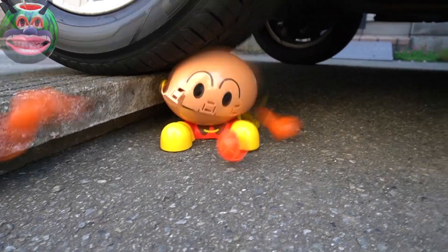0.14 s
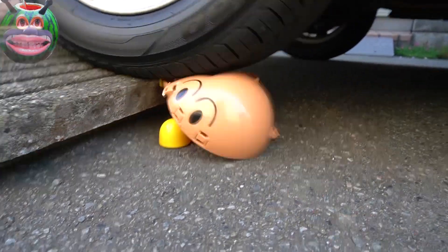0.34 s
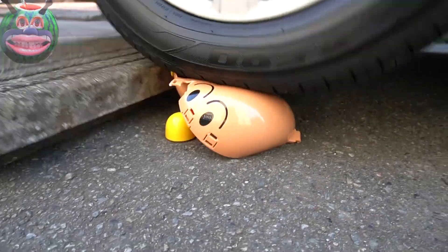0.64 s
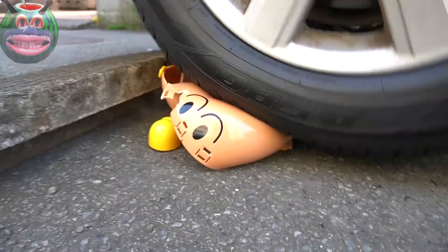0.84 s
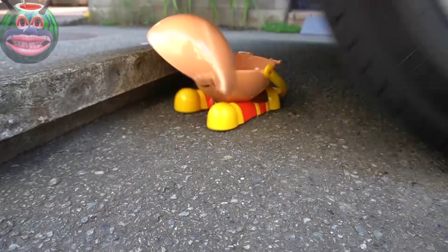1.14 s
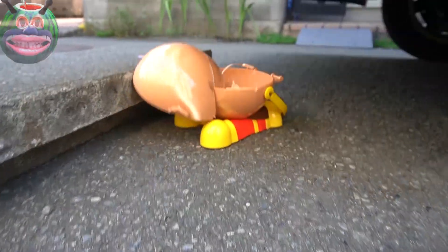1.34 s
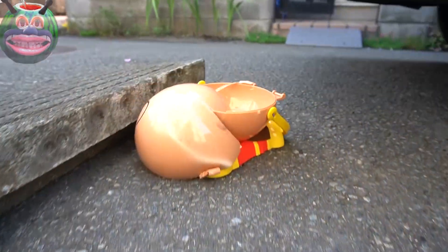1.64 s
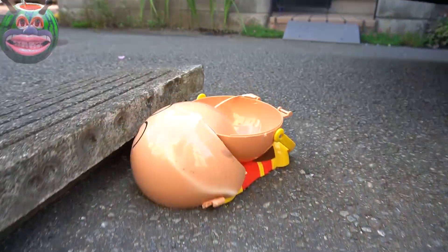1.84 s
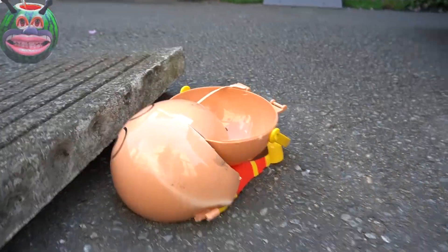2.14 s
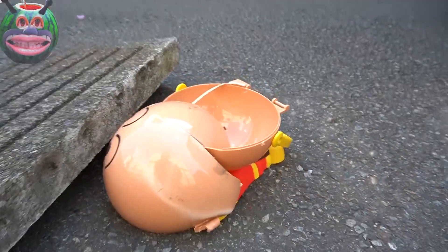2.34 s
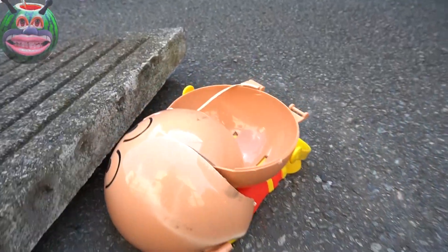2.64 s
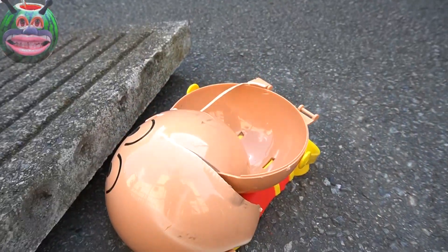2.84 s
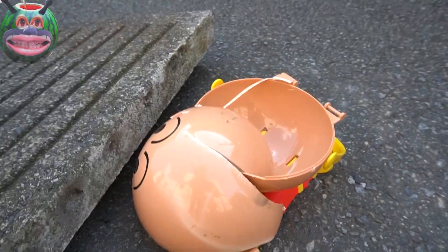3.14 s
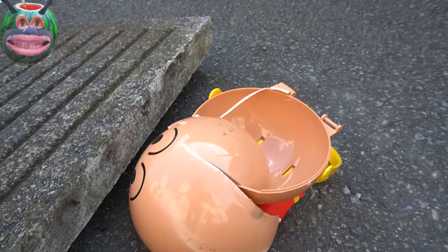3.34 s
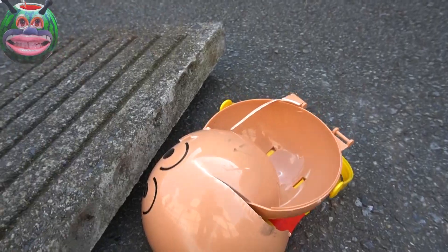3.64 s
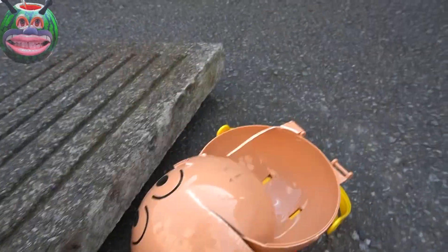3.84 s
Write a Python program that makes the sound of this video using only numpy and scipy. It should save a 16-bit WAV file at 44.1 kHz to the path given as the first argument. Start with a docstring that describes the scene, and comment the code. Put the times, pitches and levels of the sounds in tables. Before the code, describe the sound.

Loud cracking and crunching of a hollow plastic toy under a car tyre, close by on asphalt. The shell groans and squeaks, then its halves rattle and settle. Quiet street air follows, ending with one sharp tick.

```python
"""Loud cracking and crunching: a car tyre rolls over a hollow hard plastic toy on asphalt by a concrete ramp.
Quick slips, cracks and grinding grit excite the shell's resonances; it hums while pinned and squeaks
under the rubber, then the halves spring free, rattle and settle by 1.8 s. Quiet street air remains,
with a low rumble, a thin whine, soft thuds near the microphone, faint ticks and a last sharp one."""
import sys
import numpy as np
from scipy import signal
from scipy.io import wavfile

SR = 44100
rng = np.random.default_rng(int(sys.argv[2]) if len(sys.argv) > 2 else 0)


def transcribe(u):
    """Save the signal u as a 16-bit wav file named by the first command-line argument.

    u: samples, shape (n,) or (channels, n), limited to [-1, 1]; the rate is SR.
    q: integer samples, one column per channel.
    """
    v = np.clip(np.atleast_2d(u).T, -1, 1)
    q = np.round(v * 32767).astype(np.int16)
    wavfile.write(sys.argv[1], SR, q)


N = 176400

# Resonances of the shell's hollow body and of its wall: pitch_hz, width_hz, gain_db
BODY_MODES = [(341, 31, -3), (494, 65, -1.5), (681, 129, 1.5), (793, 140, 1), (964, 92, 1), (1265, 160, -1)]
WALL_MODES = [(1620, 173, 1), (2190, 440, -2), (2654, 183, 3.5), (3226, 690, -0.5), (4154, 430, -1),
              (4293, 297, -0.5)]
TIME_S = np.arange(N) / SR
ATTACK_S = 0.00054   # of cracks and knocks
SIDE_DB = -9         # part of the crunch that differs between the ears
MODE_SWELL_DB = 2.5  # how much each resonance comes and goes under friction


def amp(db):
    return 10 ** (np.asarray(db) / 20)


def unit_rms(x):
    return x / np.sqrt(np.mean(x ** 2) + 1e-20)


def pan(left_over_right_db):
    return amp(left_over_right_db * np.array([[.5], [-.5]]))


def highpass(x, hz, order=2):
    return signal.sosfilt(signal.butter(order, hz, "high", fs=SR, output="sos"), x)


def in_time(rows):
    """Linear interpolation of each column over the time in the first; end values are held."""
    times, *columns = np.transpose(rows)
    return [np.interp(TIME_S, times, column) for column in columns]


def at_hz(points, hz):
    """Interpolation on a logarithmic frequency axis."""
    frequencies, values = np.transpose(points)
    return np.interp(np.log(hz), np.log(frequencies), values)


def drift(rate_hz):
    """Slow random modulation: low-passed noise of unit rms."""
    step, run_in = 40, 2000
    pole = np.exp(-2 * np.pi * rate_hz * step / SR)
    noise = rng.standard_normal(N // step + run_in + 2)
    slow = signal.lfilter([1], [1, -2 * pole, pole * pole], noise)[run_in:]
    return np.interp(np.arange(N) / step, np.arange(len(slow)), unit_rms(slow))


def resonate(x, hz, width_hz, stages=1):
    """Damped resonators in series, each with unit gain at its peak."""
    r = np.exp(-np.pi * width_hz / SR)
    feedback = [1, -2 * r * np.cos(2 * np.pi * hz / SR), r * r]
    for _ in range(stages):
        x = signal.lfilter(np.array([1, 0, -1]) * (1 - r * r) / 2, feedback, x)
    return x


def modal_bank(x, modes, swell_db=0):
    """Modal superposition: resonances of alternating sign, normalised by their summed noise power."""
    power = sum(amp(2 * db) * np.pi * width_hz / SR for _, width_hz, db in modes)
    out = 0
    for k, (hz, width_hz, db) in enumerate(modes):
        swell = amp(swell_db * np.tanh(drift(25))) if swell_db else 1
        out += (-1) ** k * amp(db) * swell * resonate(x, hz, width_hz)
    return out / np.sqrt(power)


def damped_sines(rows, rise_s, fall_s):
    """Free vibration: one exponentially decaying sine for each row of start_s, level_db, pitch_hz."""
    out, t = np.full(N + SR, 1e-18), np.arange(SR // 8) / SR
    envelope = (1 - np.exp(-t / rise_s)) * np.exp(-t / fall_s)
    envelope /= envelope.max()
    for start_s, db, hz in rows:
        i = int(start_s * SR)
        out[i:i + len(t)] += amp(db) * envelope * np.sin(2 * np.pi * hz * t)
    return out[:N]


def burst_noise(count, size):
    """Partly coherent stereo noise, saturated to an even size; axes are burst, ear, sample."""
    mid, side = np.tanh(3 * rng.standard_normal((2, count, size)))
    side *= amp(SIDE_DB)
    return np.stack([mid + side, mid - side], axis=1) / np.sqrt(1 + amp(2 * SIDE_DB))


def banded_noise(spectrum, flicker_db):
    """Diffuse noise of unit rms: half-octave bands, each with its own level and interaural coherence."""
    # Likeness of the two ears: frequency_hz, coherence
    coherences = [(60, 1), (180, 0.86), (550, 0.98), (1650, 0.16), (4970, 0.86), (15000, 0.85)]
    # Interaural level difference: frequency_hz, left_over_right_db
    balance = [(60, -2), (180, 1), (550, -5), (1650, -9.5), (4970, -6), (15000, -7)]
    out, edges = 0, 25 * 2 ** np.arange(0, 9.6, .5)
    white = rng.standard_normal((2, 2, N))
    for k, (low, high) in enumerate(zip(edges, edges[1:])):
        hz = np.sqrt(low * high)
        if spectrum[0][0] <= hz <= spectrum[-1][0]:
            bandpass = signal.butter(2, [low, high], "band", fs=SR, output="sos")
            mid, side = signal.sosfilt(bandpass, white[k % 2])
            coherence = np.clip(at_hz(coherences, hz), -1, 1)
            band = np.sqrt(1 + coherence) * mid + np.sqrt(1 - coherence) * side * [[1], [-1]]
            out += amp(at_hz(spectrum, hz) + flicker_db * drift(22)) * pan(at_hz(balance, hz)) * band
    return unit_rms(out)


def splinters(x):
    """Splintering plastic radiates a gently falling treble band, less coherent between the ears."""
    mid = (x[0] + x[1]) / 2
    side = (x[0] - x[1]) / 2 * amp(4)
    treble = highpass(np.array([mid + side, mid - side]), hz=4600, order=3)
    return signal.lfilter([1], [1, -0.88], treble)


def friction_grains(per_s=9800, spread_db=5, end_s=1.76):
    """Shot noise: grit and tearing plastic give dense random impulses of uneven size."""
    occurs = rng.random((2, N)) < per_s / SR
    sizes = amp(spread_db * np.minimum(rng.exponential(1, (2, N)), 3))
    mid, side = occurs * sizes * rng.choice([-1, 1], (2, N))
    grains = unit_rms(mid + amp(SIDE_DB) * side * [[1], [-1]])
    return grains * (TIME_S < end_s) * amp(1.1 * drift(150))


def grind(grains):
    """Forced vibration: the grains drive the shell under the tyre and through its final rattle."""
    # Drive to each part of the shell: time_s, wall_db, body_db, splinter_db
    drive = [(0, -18, -16.5, -31), (0.045, -21.5, -46, -36.5), (0.065, -22, -24, -32),
             (0.12, -65, -34.5, -42), (0.188, -27, -28, -32.5), (0.2, -12.5, -20, -19),
             (0.23, -17, -23, -25), (0.25, -14.5, -21, -20), (0.3, -22.5, -27.5, -26.5),
             (0.315, -16, -27, -18.5), (0.35, -15, -17.5, -28.5), (0.385, -24, -23.5, -28),
             (0.41, -18, -21, -22), (0.46, -15.5, -19, -32), (0.49, -24.5, -30, -26.5),
             (0.52, -30, -31, -31.5), (0.56, -28, -25.5, -31), (0.6, -28, -37, -27),
             (0.63, -19.5, -25, -23.5), (0.66, -19, -22, -17.5), (0.7, -19, -23, -15.5),
             (0.735, -21, -25, -16.5), (0.75, -21, -29, -35.5), (0.775, -31, -57, -32.5),
             (0.8, -26, -20, -25.5), (0.83, -23, -26, -21), (0.87, -22, -23.5, -22.5),
             (0.9, -24, -29, -24.5), (0.98, -27, -24.5, -32), (1.02, -18, -34.5, -29),
             (1.055, -34, -32, -57), (1.09, -23.5, -30, -74.5), (1.125, -33, -37, -99),
             (1.15, -15, -30.5, -47), (1.185, -37, -28, -77), (1.205, -34.5, -44, -56),
             (1.24, -20, -20.5, -42), (1.28, -32, -38, -42), (1.31, -31, -32.5, -47),
             (1.34, -29.5, -27.5, -47), (1.37, -37, -38, -49), (1.44, -56, -49, -60),
             (1.48, -40, -36.5, -79), (1.545, -74, -68, -77), (1.565, -21, -54, -54),
             (1.6, -25, -30.5, -43), (1.65, -39, -48, -78.5), (1.76, -73, -54.5, -78)]
    wall_db, body_db, splinter_db = in_time(drive)
    body = modal_bank(grains.mean(axis=0) * amp(body_db), BODY_MODES, MODE_SWELL_DB)
    wall = modal_bank(grains * amp(wall_db), WALL_MODES, MODE_SWELL_DB)
    return body + wall + splinters(grains * amp(splinter_db))


def rumble():
    """Low-frequency broadband noise of the rolling tyre, then of the street."""
    # Envelope of the rumble: time_s, level_db
    levels = [(0, -43), (.14, -45), (.25, -40), (.31, -49), (.36, -38.5), (.42, -53), (.48, -45), (.8, -46),
              (1.0, -50.5), (1.38, -62.5), (2.4, -55.5), (3.3, -58.5), (3.6, -51), (4.0, -46)]
    # Its relative spectral density: frequency_hz, density_db
    spectrum = [(15, -54), (25, -32), (102, 2.5), (172, 4), (216, 7.5), (382, -10), (520, -51), (880, -120)]
    return amp(in_time(levels)[0]) * banded_noise(spectrum, flicker_db=1)


def cracks():
    """Impulsive excitation: each crack is a push, a click and a dying burst that ring the shell."""
    # Cracks of the shell: start_s, level_db, ring_hz, hollow_hz, body_gain_db, splinter_gain_db, t60_s
    events = [(0.0084, -8.5, 2630, 1230, -12, -13, 0.023), (0.0224, -5, 2320, 627, -8, -14, 0.029),
              (0.07, -6, 3300, 800, -33, -18.5, 0.049), (0.085, -4.5, 2820, 704, -21, -16, 0.047),
              (0.0974, -1, 2330, 726, -21, -20, 0.036), (0.1072, -4, 3400, 600, -22, -16, 0.086),
              (0.1228, -4, 2640, 580, -18, -14, 0.028), (0.1328, -3, 3350, 576, -27, -18, 0.017),
              (0.1397, -3, 2750, 590, -19, -16, 0.024), (0.1487, -1, 2780, 1220, -33, -15, 0.02),
              (0.1584, -4.5, 3320, 560, -32, -18, 0.032), (0.1689, -3.5, 2550, 1280, -19, -18, 0.02),
              (0.1784, -2.5, 2970, 520, -25, -22, 0.035), (0.1933, -1, 2580, 1294, -18, -11.5, 0.044),
              (0.2129, -3.5, 2800, 476, -14, -8, 0.017), (0.258, -9, 1760, 1280, -2, -6, 0.017),
              (0.2733, -17, 4200, 477, -8, -8, 0.05), (0.3097, -7.5, 2950, 670, -6.5, -5.5, 0.051),
              (0.3774, -9, 3650, 668, -18, -9, 0.03), (0.396, -5, 2920, 654, -23.5, -4.5, 0.035),
              (0.4549, -15.5, 3420, 684, -15, -1.5, 0.047), (0.4944, -19, 3860, 746, -26, -35, 0.049),
              (0.5064, -25, 3520, 352, -30, 2.5, 0.02), (0.5238, -10, 3380, 810, -17, -22, 0.076),
              (0.5382, -16, 3100, 960, -11, -1, 0.027), (0.5466, -6.5, 1730, 945, -17, -9.5, 0.015),
              (0.5689, -41, 4100, 980, -28, 21.5, 0.041), (0.7358, -12.5, 3300, 980, -18, -2.5, 0.012),
              (0.7545, -7, 1660, 760, -17, -11, 0.013), (0.7673, -10.5, 2130, 840, 4.5, 0.5, 0.02),
              (0.9028, -5.5, 2300, 784, -22, -14, 0.031), (0.9212, -9, 1820, 700, -30, -14, 0.02),
              (0.9376, -10, 2620, 710, -9, -6, 0.026), (0.9448, -5.5, 1620, 890, -8, -7, 0.015),
              (0.9879, -6, 3050, 1020, -14.5, -20, 0.037), (1, -10.5, 2750, 754, -41, -2, 0.025),
              (1.015, -9.5, 3150, 990, -6, -9, 0.047), (1.0209, -11, 2470, 990, -6.5, -6.5, 0.041),
              (1.0418, -15, 3200, 920, -12, -25, 0.031), (1.066, -7.5, 1420, 1010, -14.5, -15.5, 0.069),
              (1.0814, -6.5, 3070, 931, -28, -37, 0.027), (1.1024, -11.5, 3100, 1050, -8.5, -18, 0.055),
              (1.1329, -7.5, 2860, 850, -15.5, -16.5, 0.058), (1.1463, -6, 3220, 880, -11, -17, 0.019),
              (1.1632, -7, 1860, 1300, -8, -11, 0.045), (1.2157, -14, 1660, 920, -5.5, -13, 0.088),
              (1.2314, -5, 2090, 800, -20, -19, 0.069), (1.2644, -11, 2900, 800, -9.5, -23, 0.073),
              (1.3225, -16, 1760, 1026, -8, -14, 0.072), (1.4568, -31, 3600, 1100, 0, -17.5, 0.073),
              (1.4754, -34, 2440, 1290, -7, -11.5, 0.035), (1.5027, -32, 1780, 890, -6.5, -21, 0.094),
              (1.559, -20, 2960, 765, -4.5, -20.5, 0.11), (1.5718, -11, 2800, 886, -8.5, -29, 0.056),
              (1.6358, -22, 2800, 786, -4.5, -24, 0.098), (1.6735, -21.5, 3140, 850, -26, -25, 0.055),
              (1.731, -29, 2950, 778, -26, -29, 0.065)]
    click_db, snap_db, snap_s = 11, 8, 0.00055
    size = SR // 8
    t = np.arange(size) / SR
    onset = (1 + amp(snap_db) * np.exp(-t / snap_s)) * (1 - np.exp(-t / ATTACK_S))
    body, wall, treble, rings, push = np.full((5, 2, N + size), 1e-18)
    for noise, event in zip(burst_noise(len(events), size), events):
        start_s, db, ring_hz, hollow_hz, body_db, splinter_db, t60_s = event
        i = int(start_s * SR)
        span = np.s_[:, i:i + size]
        burst = noise * amp(db - 7.5) * onset
        decay_db = -60 * t / t60_s
        wall_burst = burst * amp(decay_db)
        body_burst = burst.mean(axis=0) * amp(body_db + 0.5 + decay_db / 1.4)  # lows last longer
        push[:, i] += amp(db + body_db + 22)
        body[span] += body_burst
        wall[span] += wall_burst
        treble[span] += burst * amp(splinter_db + 13 + decay_db / 0.77)
        # A clean click opens the crack's own two resonances.
        wall_burst[:, 0] = amp(db + click_db)
        body_burst[0] = amp(db + body_db + click_db)
        rings[span] += amp(14.5) * resonate(wall_burst, ring_hz, width_hz=510, stages=2)
        rings[span] += amp(23) * resonate(body_burst, hollow_hz, width_hz=170)
    thump = resonate(push, hz=429, width_hz=290, stages=2)
    shell = modal_bank(body, BODY_MODES) + modal_bank(wall, WALL_MODES)
    return (shell + splinters(treble) + rings + thump)[:, :N]


def knocks():
    """Hard hollow knocks: heavily damped vibrations of the shell."""
    # Knocks on the shell: start_s, level_db, pitch_hz
    events = [(.022, -6.5, 613), (.193, -11.5, 600), (.2575, -10, 1860), (.546, -12, 840),
              (.5465, -8.5, 2150), (.7576, -5.5, 780), (.7612, -10.5, 800), (.944, -4.5, 850),
              (.989, -9, 1010), (1.066, -9, 1030), (1.3225, -9.5, 915), (1.5722, -4, 870)]
    return damped_sines(events, rise_s=ATTACK_S, fall_s=0.0011)


def buckles():
    """Buckling: the shell caves in with low, damped thumps."""
    # Collapses of the shell: start_s, level_db, pitch_hz
    events = [(.196, -21.5, 250), (.243, -24, 183), (.27, -19.5, 355), (.272, -25.5, 476), (.345, -31, 125),
              (.82, -22.5, 363), (.857, -25, 373)]
    return highpass(damped_sines(events, rise_s=0.0018, fall_s=0.0078), hz=125)


def hums():
    """Stick-slip oscillation: the pinned shell sounds gliding, wavering sine tones as it slips."""
    # One track for each hum: time_s, pitch_hz, rms_db
    tracks = [
        [(0.33, 228, -53.5), (0.366, 227, -26.5), (0.394, 228, -33), (0.404, 236.3, -52.5),
         (0.46, 230.8, -26.5), (0.536, 227.7, -37.5), (0.552, 230.6, -54), (0.618, 235, -36)],
        [(0.746, 791.4, -49), (0.76, 786, -18), (0.776, 810, -21.5), (0.806, 797, -9), (0.83, 795, -25.5),
         (0.838, 769, -19), (0.884, 807, -44)],
        [(0.62, 943, -50), (0.636, 1011, -28), (0.666, 1032, -31), (0.7, 940, -50), (0.712, 990, -18.5),
         (0.752, 940, -42), (0.76, 952.2, -26.5)],
        [(0.245, 1308, -24), (0.273, 1315, -30), (0.3, 1300, -22.5)],
        [(0.3, 658.8, -45), (0.314, 681.6, -26), (0.372, 667.6, -29), (0.396, 617, -26), (0.428, 674, -34),
         (0.456, 717, -32), (0.476, 680, -26), (0.5, 710, -42)],
        [(0.3, 547.5, -37.5), (0.312, 564, -28), (0.374, 538, -31), (0.42, 533, -33)],
    ]
    # Unsteadiness of each hum: waver_db
    wavers = [1.8, 0.63, 1.5, 0.9, 2.2, 4.5]
    out, fade_s = np.zeros(N), 0.01
    for track, waver_db in zip(tracks, wavers):
        hz, db = in_time(track)
        start_s, end_s = track[0][0], track[-1][0]
        fade = np.clip(np.minimum(TIME_S - start_s, end_s - TIME_S) / fade_s, 0, 1)
        tone = np.sqrt(2) * np.sin(2 * np.pi * np.cumsum(hz) / SR)
        out += fade * amp(db + waver_db * drift(31)) * tone
    return out


def squeak(grains, width_hz=600):
    """Friction of rubber dragging on the shell excites two high resonances."""
    # Strength of the drag: time_s, level_db
    levels = [(0.8, -61), (0.825, -31), (0.885, -24), (0.9, -59)]
    # Resonances of the squeak: pitch_hz
    pitches = [6000, 8000]
    dragging = (TIME_S > levels[0][0]) & (TIME_S < levels[-1][0])
    drag = grains * amp(in_time(levels)[0]) * dragging
    return modal_bank(drag, [(hz, width_hz, 0) for hz in pitches], MODE_SWELL_DB)


def street_air(left_lag_s=0.00008):
    """Diffuse background noise that reaches the left ear slightly later."""
    # Envelope of the street air: time_s, level_db
    levels = [(1.8, -52.5), (2.1, -52), (2.8, -50.5), (3.4, -48.5), (3.75, -47), (4.0, -43.5)]
    # Its relative spectral density: frequency_hz, density_db
    spectrum = [(150, -34), (250, -20.5), (407, -8), (576, -3.5), (629, -9.5), (761, -1), (1080, -11),
                (2240, -6.5), (8260, -24), (11900, -26.5), (16000, -35)]
    air = amp(in_time(levels)[0]) * banded_noise(spectrum, flicker_db=1.5)
    air[0] = np.roll(air[0], int(left_lag_s * SR))
    return air


def drone():
    """Narrow-band noise heard as a faint low pitch, perhaps an idling engine."""
    return amp(-66) * unit_rms(resonate(rng.standard_normal(N), hz=205, width_hz=25, stages=2))


def whine():
    """Noise through a sharp resonance, heard as a thin, wavering high tone."""
    # Envelope of the whine: time_s, level_db
    levels = [(1.85, -71), (2.1, -82), (2.2, -71), (2.3, -80), (2.45, -69), (2.55, -73), (3.2, -78),
              (4, -78)]
    tone = unit_rms(resonate(rng.standard_normal((2, N)), hz=11650, width_hz=60, stages=2))
    return amp(in_time(levels)[0] + 2.2 * drift(8)) * tone


def thuds():
    """Dull bumps near the microphone: two inharmonic damped vibrations each, without deep bass."""
    # Upper partial of each thud: start_s, level_db, pitch_hz
    upper = [(2.38, -53, 210), (2.525, -39, 104), (2.721, -40, 221), (2.921, -42.5, 200),
             (3.343, -41.5, 185), (3.478, -47, 220), (3.603, -42, 287), (3.787, -41, 208),
             (3.848, -42.5, 116), (3.969, -43, 202)]
    lower = [(start_s, db + 3, hz * 0.548) for start_s, db, hz in upper]
    return highpass(damped_sines(upper + lower, rise_s=0.0019, fall_s=0.011), hz=125)


def ticks():
    """Dry ticks close by: decaying noise bursts excite a bright resonance and a woody body."""
    # Ticks: start_s, level_db, centre_hz, width_hz, body_gain_db, t60_s
    events = [(2.73, -46, 5920, 4000, -30, 0.078), (3.203, -47, 6500, 3000, -30, 0.025),
              (3.513, -50, 6500, 5000, -28, 0.14), (3.808, -43, 5500, 3000, -32, .015),
              (3.9491, -11, 4760, 3570, 5.5, 0.0091)]
    out, t = np.zeros(N + SR), np.arange(SR // 16) / SR
    noises = burst_noise(len(events), len(t))[:, 0]
    for noise, (start_s, db, hz, width_hz, body_db, t60_s) in zip(noises, events):
        burst = noise * amp(db - 60 * t / t60_s)
        top = resonate(resonate(burst, hz, width_hz), hz, 2 * width_hz)
        body = resonate(burst, hz=1770, width_hz=1300, stages=2)
        i = int(start_s * SR)
        out[i:i + len(t)] += top + amp(body_db) * body
    return out[:N]


def with_echoes(x):
    """Early reflections from the car's underside and the ramp, each crossing to the other ear."""
    # Reflections: left_delay_s, left_db, right_db
    reflections = [(.0021, -20.5, -18), (.0047, -15.5, -16.5), (.0093, -30, -23.5), (.017, -15.5, -18),
                   (.031, -22, -16)]
    out = x.copy()
    for delay_s, left_db, right_db in reflections:
        left_lag, right_lag = int(delay_s * SR), int(delay_s * 1.1 * SR)
        out[0, left_lag:] += amp(left_db) * x[1, :-left_lag]
        out[1, right_lag:] += amp(right_db) * x[0, :-right_lag]
    return out


def scene():
    """Superposition of the crushed toy, slightly to the left, and the sounds of the street."""
    background = street_air() + rumble() + drone()
    impacts = cracks() + knocks()
    grains = friction_grains()
    crunch = with_echoes(impacts + squeak(grains) + grind(grains))
    toy = highpass(crunch, hz=240) + hums() + buckles()  # a small shell radiates little bass
    return toy * pan(0.73) + background + thuds() + ticks() + whine()


def record(dry):
    """Soft saturation rounds the peaks; a steep low-pass removes the highest treble."""
    ceiling, stopband_hz = 1.2, 16480
    lowpass = signal.cheby2(14, 60, stopband_hz, fs=SR, output="sos")
    return signal.sosfilt(lowpass, ceiling * np.tanh(dry / ceiling))


dry = scene()
out = record(dry)
transcribe(out)
```